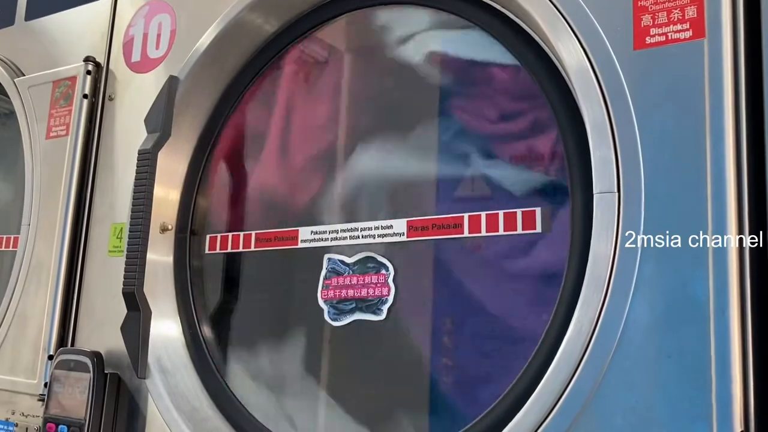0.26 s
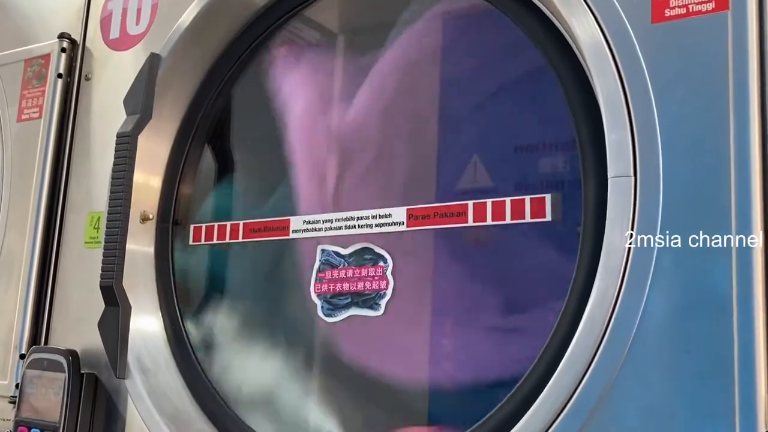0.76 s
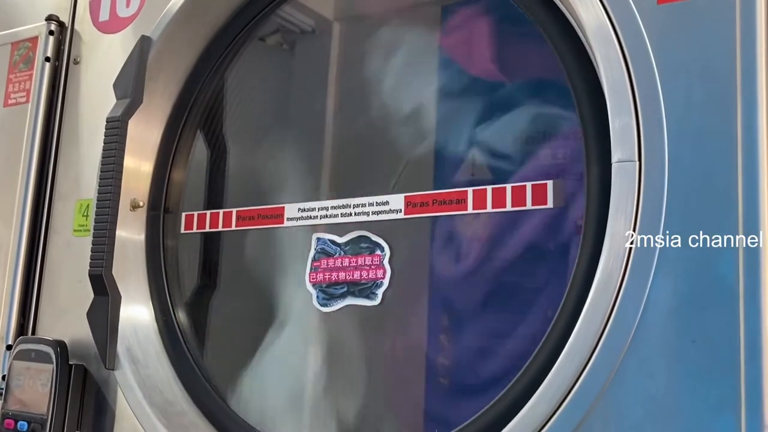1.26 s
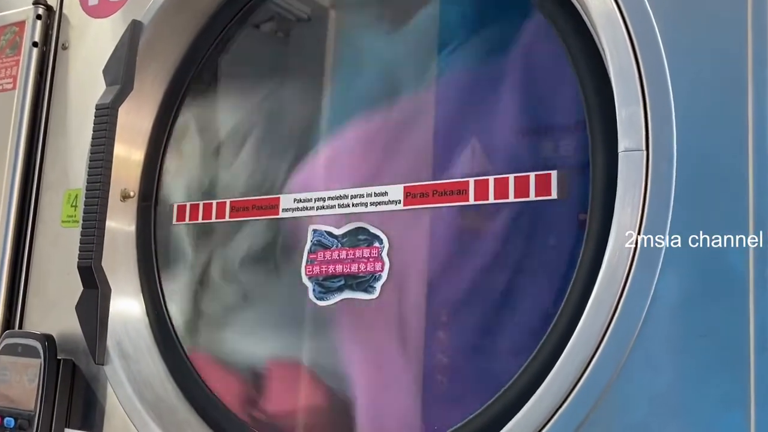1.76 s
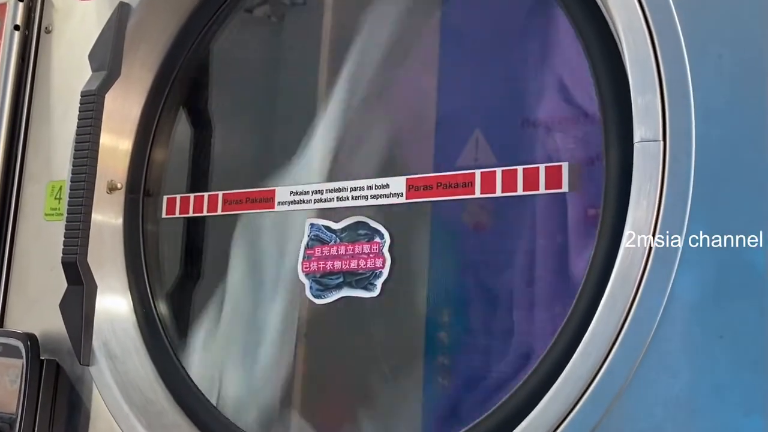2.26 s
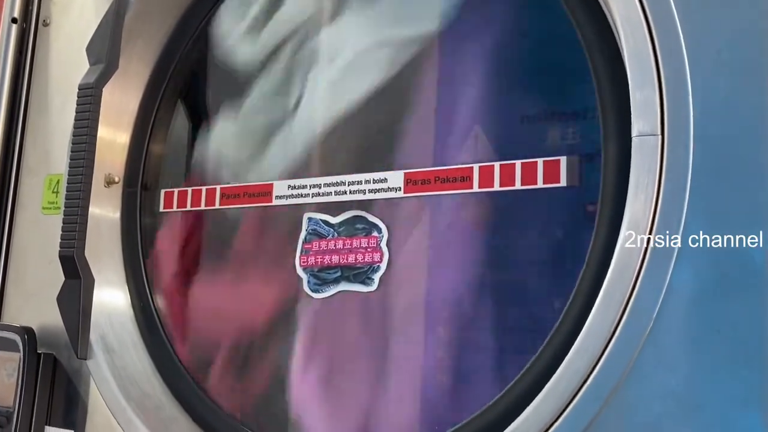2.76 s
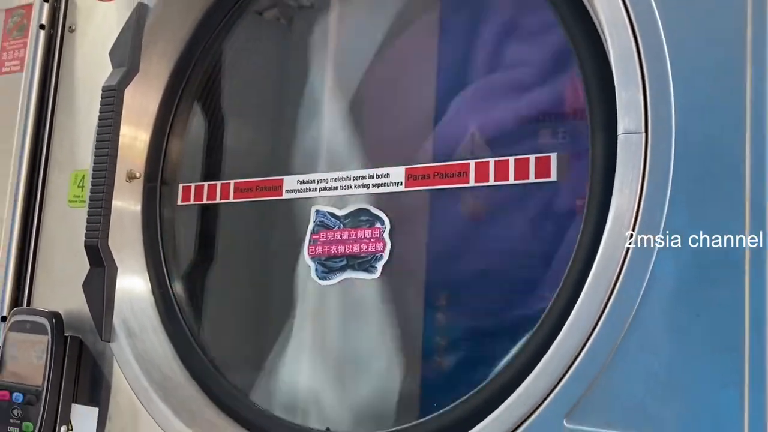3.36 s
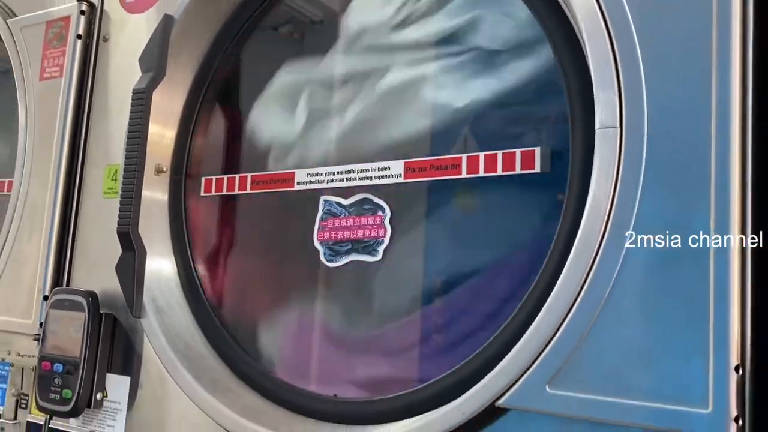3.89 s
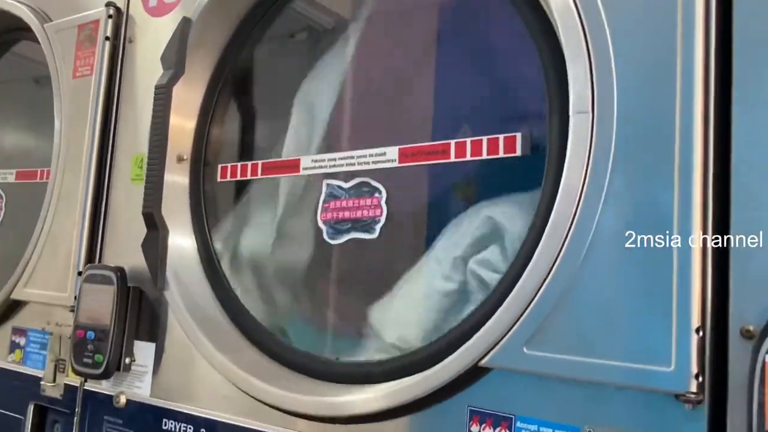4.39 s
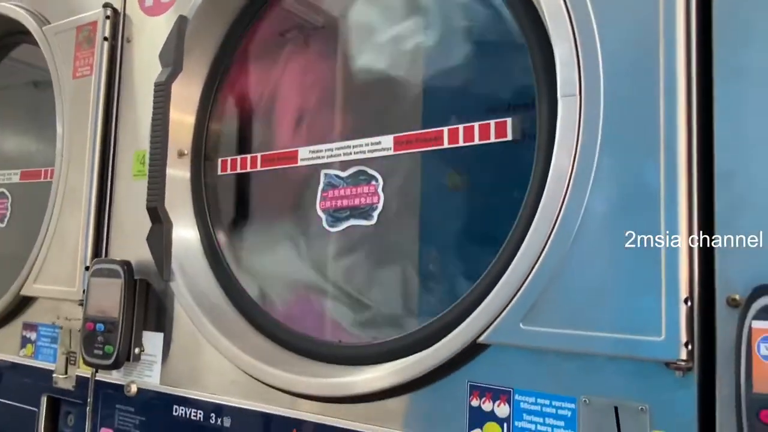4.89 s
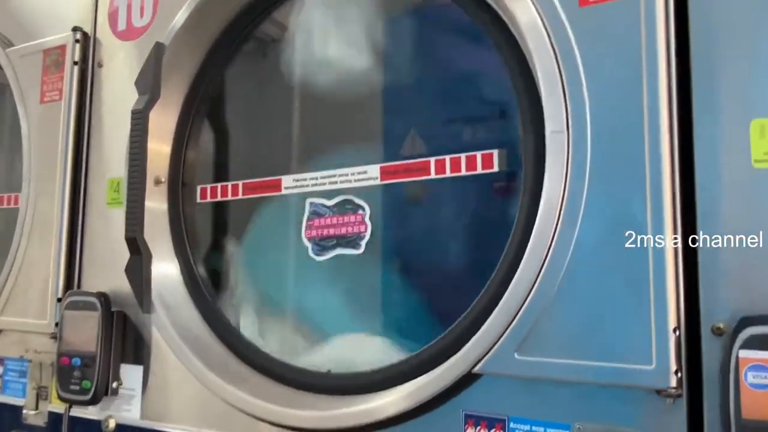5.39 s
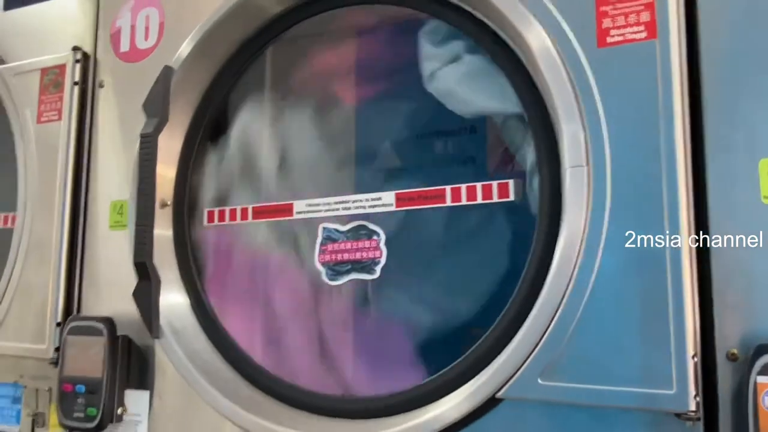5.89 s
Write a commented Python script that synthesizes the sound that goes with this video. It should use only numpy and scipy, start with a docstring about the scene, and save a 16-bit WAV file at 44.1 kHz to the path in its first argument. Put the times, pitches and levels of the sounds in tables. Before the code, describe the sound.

Close to the glass door of a coin-laundry dryer, a deep mains hum beats rapidly against a second motor over low rumble and blower roar. Wet-soft garments slide and brush, buttons tick faintly, and a thin whine wavers. After the microphone moves back, a broad airy whoosh swells and fades into a hollow duct rush with small metal squeaks.

```python
"""Mains hum beating against a second motor over a low rumble: a coin-laundry tumble dryer turns its load.
It is heard from just outside the glass door, then a step back; the blower slowly quickens.
Hum, blower, whine and squeaks are roughened sines; rumble, roar, rush and whoosh are shaped noise.
Garments slide and buttons tick as swelling bands of noise; one broad whoosh fades into the hollow duct rush."""
import sys
import numpy as np
from scipy import signal
from scipy.fft import rfft, irfft
from scipy.io import wavfile
from scipy.ndimage import map_coordinates

SR = 44100
rng = np.random.default_rng(int(sys.argv[2]) if len(sys.argv) > 2 else 0)


def wav_out(sig):
    """Save sig, one row per channel (or a flat mono array), as 16-bit PCM at SR to the path in sys.argv[1]."""
    wavfile.write(sys.argv[1], SR, np.round(np.clip(np.atleast_2d(sig).T, -1, 1) * 32767).astype(np.int16))


N = 270774
TIME = np.arange(N) / SR
FREQS = np.maximum(np.arange(N // 2 + 1) * SR / N, 1)


def from_db(db):
    """Decibels to gain."""
    return 10 ** (np.asarray(db) / 20)


def in_time(rows):
    """The columns of a curve over t/s, interpolated at every sample."""
    s, *columns = np.transpose(rows)
    return [np.interp(TIME, s, column) for column in columns]


def across_hz(points):
    """A table over f/Hz, joined by straight lines over log frequency."""
    hz, value = np.transpose(points)
    return np.interp(np.log(FREQS), np.log(hz), value)


def lowpass_power(x, corner_hz, power):
    """Zero-phase low-pass: gain 1/2 at the corner."""
    return irfft(rfft(x) / (1 + (FREQS / corner_hz) ** power), N)


def bandpass(x, low_hz, high_hz, floor_hz):
    """Second-order band of x, its edges held inside the usable range."""
    edges_hz = np.clip([low_hz, high_hz], floor_hz, .45 * SR)
    sos = signal.butter(2, edges_hz, "band", fs=SR, output="sos")
    return signal.sosfilt(sos, x)


def drift(rate_hz):
    """Slow random signal, mean 0, spread 1, changing about rate_hz times a second."""
    slow = lowpass_power(rng.standard_normal(N), rate_hz, 2)
    return (slow - slow.mean()) / slow.std()


def swell(crest_s, rise_s, fall_s, power=2):
    """Hump of height 1, down to 1/e after its rise and fall times; power 1 is sharp, 2 round."""
    side_s = np.where(TIME < crest_s, rise_s, fall_s)
    return np.exp(-np.abs((TIME - crest_s) / side_s) ** power)


def tone(hz, level_db, rough, flutter_hz):
    """A line of RMS level_db whose strength and phase are shaken by turbulence."""
    phase = 2 * np.pi * (np.cumsum(hz * np.ones(N)) / SR + rng.random())
    in_phase = (1 + rough * drift(flutter_hz)) * np.cos(phase)
    quadrature = rough * drift(flutter_hz) * np.sin(phase)
    return from_db(level_db) * (in_phase + quadrature) * np.sqrt(2 / (1 + 2 * rough ** 2))


def noise(db_per_hz):
    """Turbulence with the given spectrum."""
    return irfft(rfft(rng.standard_normal(N)) * from_db(db_per_hz), N) * np.sqrt(SR / 2)


def resonances(width_hz):
    """Crowded cabinet and duct modes: random ripple over frequency, spread about 1."""
    knots = rng.standard_normal(4000)
    return np.interp(FREQS / width_hz, np.arange(len(knots)), knots)


def stereo(mid, side):
    """Left and right from their common and opposite parts."""
    return np.array([mid + side, mid - side])


def placed(x, pan_db, lag_s):
    """One sound at both ears: louder on the left by pan_db, and later there by lag_s."""
    left = np.roll(x, round(lag_s * SR)) * from_db(pan_db / 2)
    return np.array([left, x * from_db(-pan_db / 2)])


# left-right likeness of room sound, clipped to +-0.99 in use: f/Hz, correlation
LIKENESS = [(25, 0.83), (60, 1), (130, 0.84), (280, 0.84), (450, 0.56), (650, 0.41), (1000, 0.29),
            (1500, -0.055), (2200, -0.23), (3200, -0.42), (4000, 0.041), (5400, -0.56), (6700, 0.56),
            (9000, -1.7), (11000, 1), (13000, -0.82), (15000, 0.72)]


def room_noise(spectrum, ripple_db, modes=()):
    """Air noise from all round: alike at both ears in the bass, mixed likeness higher up."""
    alike = np.clip(across_hz(LIKENESS), -.99, .99)
    colour = across_hz(spectrum) + ripple_db * resonances(width_hz=18)
    for hz, width_hz, lift_db in modes:
        colour = colour + lift_db / (1 + (2 * (FREQS - hz) / width_hz) ** 2)
    mid = noise(colour + 10 * np.log10((1 + alike) / 2))
    side = noise(colour + 10 * np.log10((1 - alike) / 2))
    return stereo(mid, side)


def eddies(x, depth_db, per_s):
    """Each eddy lifts or drops its own half octave for a moment."""
    hz, s, frames = signal.stft(x, SR, nperseg=512)
    where = np.meshgrid(2 * np.log2(1 + hz / hz[2]), s * per_s, indexing="ij")
    patches = map_coordinates(rng.standard_normal((16, 256)), where, order=1, mode="nearest")
    return signal.istft(frames * from_db(depth_db * patches), SR)[1][..., :N]


def rustle(per_s, spread_db):
    """Folds of cloth flick against the drum: a gain that clumps noise into brief uneven brushes."""
    flicks = (rng.random(N) < per_s / SR) * from_db(spread_db * np.minimum(rng.exponential(1, N), 3))
    age = TIME[:SR // 8]
    power = np.maximum(signal.fftconvolve(flicks, age * np.exp(-age / 0.0034))[:N], 0)
    share = .2  # part of the mean power that comes in flicks
    return np.sqrt(1 - share + share * power / power.mean())


# listener leans in, then steps back: t/s, distance from door/m
DISTANCE = [(0, 0.62), (1.0, 0.58), (2.25, 0.53), (2.95, 0.49), (3.35, 0.58), (3.8, 0.61), (4.3, 0.7),
            (5.4, 0.68), (6.14, 0.7)]
NEAR_M = .5


def at_distance(near_db, db_per_m):
    """Gain as the listener moves: near_db at NEAR_M, changing by db_per_m."""
    return from_db(near_db + db_per_m * (in_time(DISTANCE)[0] - NEAR_M))


MAINS_HZ = 49.95
MOTOR_HZ, MOTOR_DB = 123.6, -32
HUM_SINKS_AT_S, HUM_SINK_DB_PER_S, HUM_SINK_DEPTH_DB = 5.77, 44, 19
# hum overtones: multiple of mains, level/dB, left minus right/dB, lag at left ear/s
HUM_OVERTONES = [(4, -47.5, -3, 0), (6, -46, 0, 0), (8, -45.5, -2, .0002), (10, -48, -4, .0006)]


def motors():
    """Iron hums at twice the mains, sinking at the end; a second motor beats at about 24 Hz against it."""
    sunk_db = np.clip(HUM_SINK_DB_PER_S * (TIME - HUM_SINKS_AT_S), 0, HUM_SINK_DEPTH_DB)
    hum = tone(2 * MAINS_HZ, -sunk_db, rough=0.0079, flutter_hz=2.2)
    hum = hum * at_distance(near_db=-23, db_per_m=-8)
    buzz = np.zeros((2, N))
    for multiple, db, pan_db, lag_s in HUM_OVERTONES:
        overtone = tone(multiple * MAINS_HZ, db, rough=.4, flutter_hz=5)
        buzz += placed(overtone, pan_db, lag_s)
    second_motor = tone(MOTOR_HZ, MOTOR_DB, rough=.06, flutter_hz=3)
    return hum + buzz + second_motor


DRONE_DB, THROB_DEPTH_DB, THROBS_PER_S = -42, 4, 4.9
THROB_EDGE_S = 0.045
# strongest throbs of the drone: start t/s, length/s, level/dB
THROBS = [(.74, 0.081, -38), (1.223, 0.084, -36.5), (1.48, .06, -35), (2.036, 0.048, -32.5),
          (2.33, 0.099, -33.5), (2.613, 0.07, -32.5), (2.92, 0.082, -32.5), (3.24, 0.09, -33),
          (3.6, .1, -38), (3.85, 0.078, -36.5), (4.25, 0.074, -37.5), (4.605, 0.087, -36),
          (5.031, 0.12, -32.5)]


def throb_db():
    """Drone level: it wavers all the time, and now and then holds a stronger throb."""
    gain = from_db(DRONE_DB + THROB_DEPTH_DB * np.minimum(drift(THROBS_PER_S), 1))
    for start_s, length_s, db in THROBS:
        outside_s = np.maximum(np.abs(TIME - start_s - length_s / 2) - length_s / 2, 0)
        gain = np.maximum(gain, from_db(db) * np.exp(-(outside_s / THROB_EDGE_S) ** 2))
    return 20 * np.log10(gain)


SPEED_GAIN_PER_S = .0116  # share of starting speed
BLOWER_HZ, DRONE_HZ, SING_HZ = 78.1, 185.3, 3124  # at t = 0
# lowest blower tone: t/s, level/dB
BLOWER_LEVEL = [(0, -40), (1.4, -33), (1.8, -40), (2.5, -33), (2.9, -34.5), (3.4, -25.5), (3.7, -25.5),
                (4.05, -32), (4.45, -30.5), (4.85, -30), (5.15, -44), (5.5, -33), (6.14, -38.5)]
# other lines: starting f/Hz, base level/dB, swell/dB, crest t/s, rise/s, fall/s, roughness 0-1, flutter/Hz
BLOWER_LINES = [(DRONE_HZ / 2, -41.5, 4.9, 2.65, 3.2, 1.1, 0.12, 2.6),
                (SING_HZ, -64.5, 2.8, 3.2, .4, 3, 1, 14)]


def blower():
    """One slowly rising speed carries the low tones, the thin singing and the cabinet's drone."""
    speed = 1 + SPEED_GAIN_PER_S * TIME
    drone = tone(DRONE_HZ * speed, throb_db(), rough=.15, flutter_hz=15.0)
    lowest = tone(BLOWER_HZ * speed, in_time(BLOWER_LEVEL)[0], rough=0.055, flutter_hz=1.0)
    out = drone + lowest
    for hz, base_db, swell_db, crest_s, rise_s, fall_s, rough, flutter_hz in BLOWER_LINES:
        level_db = base_db + swell_db * swell(crest_s, rise_s, fall_s)
        out = out + tone(hz * speed, level_db, rough, flutter_hz)
    return out


# whine: t/s, f/Hz, level/dB
WHINE = [(0, 477, -58), (.5, 479, -51), (.7, 480, -43), (1.35, 484, -42), (1.46, 485, -43.5),
         (1.54, 485, -50), (1.68, 486, -40), (2.0, 487.5, -39.3), (2.2, 488.5, -44), (2.35, 489, -44),
         (2.55, 489, -59), (4.0, 483, -54), (4.2, 484, -42), (4.45, 485, -50), (4.7, 486, -46),
         (4.9, 487, -52), (5.15, 488, -44), (5.4, 490, -53), (6.14, 494, -50)]


def whine():
    """A wavering whine builds up, breaks off, and later returns more weakly."""
    hz, db = in_time(WHINE)
    return tone(hz, db, rough=.1, flutter_hz=9)


SLIDE_SPAN = 1.5  # frequency ratio, centre to edge
# garments sliding in the drum: crest t/s, half length to 1/e/s, centre f/Hz, level/dB
SLIDES = [(.05, .1, 790, -44), (1.45, 0.17, 1140, -51.5), (2.5, 0.063, 5200, -72), (2.98, .07, 696, -49),
          (3.42, 0.18, 2100, -46), (3.45, 0.35, 520, -45), (4.075, 0.046, 760, -48),
          (4.47, 0.032, 3000, -42), (4.76, 0.041, 2200, -45.5), (5.2, 0.09, 315, -36.5)]


def slides():
    """Garments slide down the drum wall: each a short swell of uneven rustle around its own pitch."""
    out = np.zeros((2, N))
    folds = rustle(per_s=94, spread_db=15)
    rubbing = rng.standard_normal((2, N))
    for crest_s, half_s, hz, db in SLIDES:
        mid, side = bandpass(rubbing, hz / SLIDE_SPAN, hz * SLIDE_SPAN, floor_hz=50)
        band = stereo(mid, side / 2)
        out += from_db(db) * swell(crest_s, half_s, half_s) * folds * band / band.std()
    return out


# buttons and zips on the drum: start t/s, level/dB, ring f/Hz, rise/s
TICKS = [(.06, -48, 4140, 0.016), (.828, -56, 13000, .018), (1.074, -51, 3600, .01),
         (1.458, -49, 3500, 0.0078), (1.461, -51, 6300, .011), (1.582, -51.5, 5500, .01),
         (2.01, -55, 6600, .012), (2.548, -47, 5740, 0.0076), (2.68, -51, 5400, 0.01),
         (3.088, -49, 5500, .009), (4.085, -46, 4370, 0.016), (5.045, -53, 6500, .01),
         (5.177, -46, 4050, 0.0062)]


def ticks(spread):
    """Small hard parts graze the drum: each scrape swells and dies in its ringing band, damped by cloth."""
    out = np.zeros(N)
    age = TIME[:SR // 4]
    for start_s, db, hz, rise_s in TICKS:
        envelope = age / rise_s * np.exp(1 - age / rise_s)
        burst = rng.standard_normal(len(age))
        burst = bandpass(burst, hz / (1 + spread), hz * (1 + spread), floor_hz=100)
        scrape = from_db(db) * envelope * burst / burst.std()
        at = round(start_s * SR)
        out[at:at + len(age)] += scrape[:N - at]
    return out


SQUEAK_WAVER, SQUEAK_WAVERS_PER_S = .003, 18  # waver as share of pitch
# rubbing metal: start t/s, end t/s, mid f/Hz, level/dB
SQUEAKS = [(1.455, 1.5, 3320, -54), (2.665, 2.72, 3385, -51), (3.04, 3.17, 3235, -57.5),
           (3.17, 3.4, 3250, -54.3), (3.28, 3.56, 3915, -61), (3.7, 3.96, 3935, -59.5),
           (3.97, 4.08, 3275, -53.5), (4.74, 4.98, 3985, -55.3), (5.0, 5.07, 3320, -58),
           (5.14, 5.23, 3970, -58), (5.15, 5.36, 3320, -61), (5.3, 5.48, 3960, -59),
           (5.51, 5.77, 3335, -59.5), (5.86, 6.02, 3352, -55), (5.88, 6.02, 1925, -50),
           (6.04, 6.14, 3385, -58)]


def squeaks():
    """Rubbing metal catches and sings: a thin, slightly grainy line that wavers and creeps up in pitch."""
    out = np.zeros(N)
    for start_s, end_s, hz, db in SQUEAKS:
        progress = np.clip((TIME - start_s) / (end_s - start_s), 0, 1)
        arch = np.sqrt(np.abs(np.sin(np.pi * progress)))
        creep = SPEED_GAIN_PER_S * (TIME - (start_s + end_s) / 2)
        waver = SQUEAK_WAVER * drift(SQUEAK_WAVERS_PER_S)
        out += arch * tone(hz * (1 + creep + waver), db, rough=.3, flutter_hz=30)
    return out


# whoosh spectrum before its gains: f/Hz, level/dB per Hz
WHOOSH_COLOUR = [(100, -90), (220, -63), (310, -58), (400, -57.5), (500, -60.5), (700, -61.3), (900, -63.8),
                 (1200, -64.2), (2000, -69.5), (3100, -70.2), (4200, -74.8), (5200, -77.5), (6300, -80.5),
                 (7600, -86), (9000, -93), (11000, -95), (16000, -108)]
WHOOSH_SPLIT_HZ, WHOOSH_BODY_DB, WHOOSH_HISS_DB = 3700, -1.5, 0.2


def whoosh():
    """A broad gust swells once; its hiss crests after the body and drops away more quickly."""
    gust = eddies(room_noise(WHOOSH_COLOUR, ripple_db=1.6), depth_db=1.9, per_s=22)
    body = lowpass_power(gust, WHOOSH_SPLIT_HZ, 4)
    hiss = gust - body
    body = from_db(WHOOSH_BODY_DB) * body * swell(crest_s=4.33, rise_s=.38, fall_s=.35, power=1.6)
    hiss = from_db(WHOOSH_HISS_DB) * hiss * swell(crest_s=4.395, rise_s=.23, fall_s=.2, power=1.8)
    return body + hiss


# spectra before distance and swell gains: f/Hz, level/dB per Hz
RUMBLE = [(15, -96), (25, -73.5), (35, -63.5), (45, -54), (56, -50.5), (67, -43.8), (77, -48.5), (88, -51),
          (95.5, -51.5), (107, -56.5), (139, -53.7), (175, -56.5), (220, -66), (2000, -160)]
ROAR = [(60, -123), (150, -64), (230, -59), (340, -58.5), (480, -61.5), (600, -63), (720, -63.5),
        (900, -68.5), (1120, -69), (1400, -72.5), (2000, -76.5), (3300, -96), (5000, -107), (8000, -105),
        (16000, -150)]
DOOR_RUSH = [(300, -97), (1500, -78), (2100, -80), (2550, -77.5), (2950, -81.5), (4000, -82), (5000, -86),
             (6300, -86), (7400, -90.5), (8500, -104), (16000, -170)]
THIN_HISS = [(3000, -140), (7000, -99), (8000, -93), (9000, -92), (10500, -93.3), (12000, -95),
             (14000, -97), (16000, -99.5)]
# gain of the thin hiss: t/s, level/dB
HISS_SWELL = [(0, -1.5), (.6, -1.5), (1.5, 0), (2.3, -1.2), (2.5, 1), (3.35, 0.2), (3.7, 0.5), (4.8, -1),
              (6.14, -0.5)]
ROAR_EDDY_DB, ROAR_EDDIES_PER_S = 1.7, 14


def airflow():
    """Drum rumble, the roar of the room, a rush from straight ahead and a thin hiss from the right."""
    rumble = room_noise(RUMBLE, ripple_db=2.0) * at_distance(near_db=0.6, db_per_m=-8)
    rumble = rumble * from_db([[-.5], [.5]])  # left, right
    roar = eddies(room_noise(ROAR, ripple_db=2.0), ROAR_EDDY_DB, ROAR_EDDIES_PER_S)
    roar = roar * at_distance(near_db=-1.5, db_per_m=3.8) * from_db([[-.25], [.25]])
    cloth = rustle(per_s=50, spread_db=1.5)
    door = noise(across_hz(DOOR_RUSH) + 1.3 * resonances(width_hz=35))
    door = eddies(door, depth_db=1.0, per_s=16)
    door = door * at_distance(near_db=0.16, db_per_m=-24) * np.sqrt(cloth)
    hiss = noise(across_hz(THIN_HISS)) * from_db(in_time(HISS_SWELL)[0]) * cloth
    return rumble + roar + door + placed(hiss, pan_db=0, lag_s=.000268)


# rush spectrum before its gain: f/Hz, level/dB per Hz
RUSH = [(100, -92), (220, -61.5), (310, -58), (450, -64.5), (900, -67.5), (1400, -66), (2200, -71),
        (3100, -71.5), (4200, -74), (5200, -76.5), (6300, -76.5), (7600, -84.5), (9000, -90), (16000, -108)]
# hollow resonances in the rush: f/Hz, width/Hz, lift/dB
DUCT_MODES = [(314, 92, 7.5), (680, 160, 5), (1130, 130, 4), (1900, 100, 2.5), (2570, 200, 1.5)]
RUSH_DB_AT_1_M, RUSH_SHIELDED_M = 1.5, 0.53


def room_rush():
    """The hollow duct rush is shut out against the door and opens up as the listener leaves it."""
    beyond_m = np.maximum(in_time(DISTANCE)[0] - RUSH_SHIELDED_M, 0)
    opening = beyond_m / (1 - RUSH_SHIELDED_M)
    rush = room_noise(RUSH, ripple_db=1.6, modes=DUCT_MODES)
    return from_db(RUSH_DB_AT_1_M) * opening * eddies(rush, depth_db=1.9, per_s=22)


def scene():
    """All layers summed; the machine's tones lean slightly to the right."""
    lean_db = 0.5
    machine = (motors() + blower() + whine()) * from_db([[-lean_db], [lean_db]])
    load = slides() + ticks(spread=0.14) + squeaks()
    return machine + load + whoosh() + airflow() + room_rush()


CUTOFF_HZ = 15700


def record(dry):
    """The top is cut steeply; 2 ms fades open and close the sound without a click."""
    edges = np.minimum(1, np.minimum(TIME, TIME[::-1]) / .002)
    sos = signal.ellip(10, .1, 80, CUTOFF_HZ, fs=SR, output="sos")
    return signal.sosfilt(sos, dry * edges)


dry = scene()
out = record(dry)
wav_out(out)
```